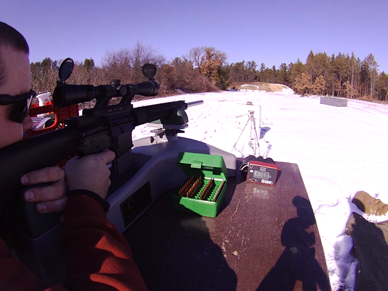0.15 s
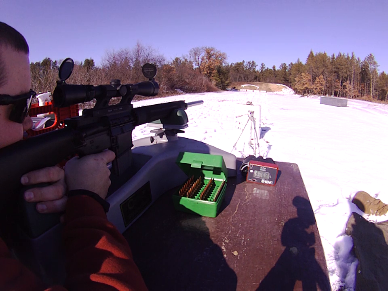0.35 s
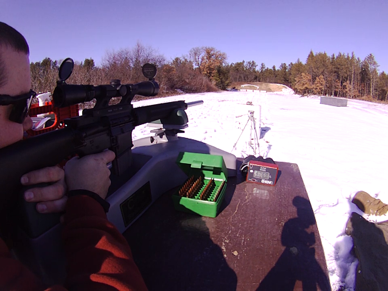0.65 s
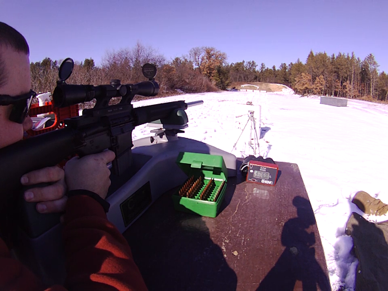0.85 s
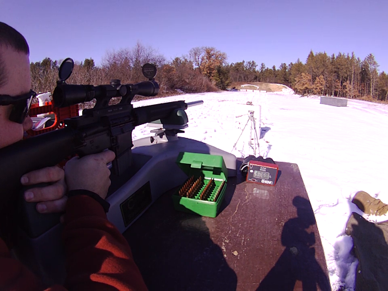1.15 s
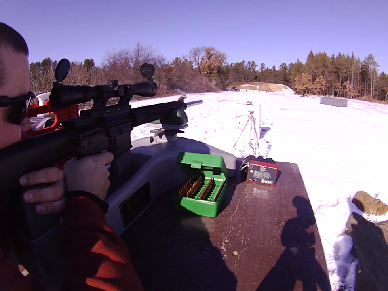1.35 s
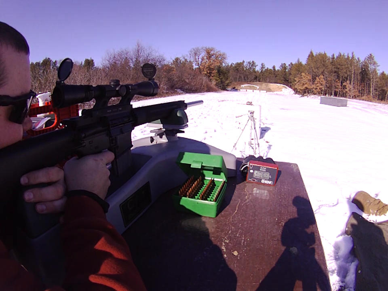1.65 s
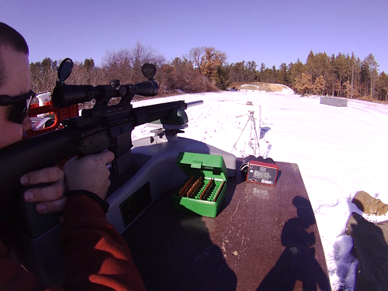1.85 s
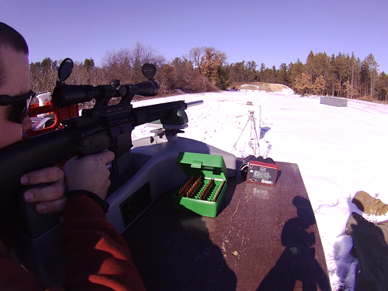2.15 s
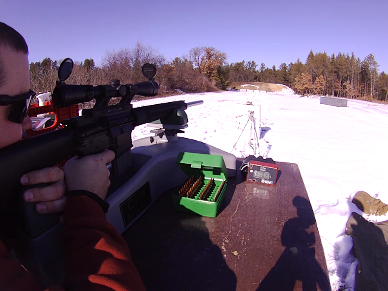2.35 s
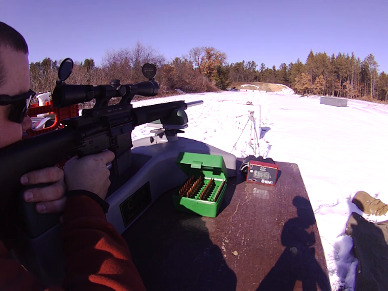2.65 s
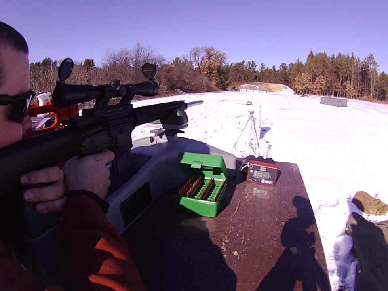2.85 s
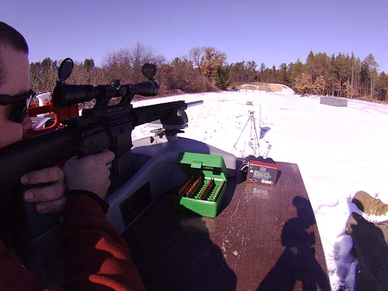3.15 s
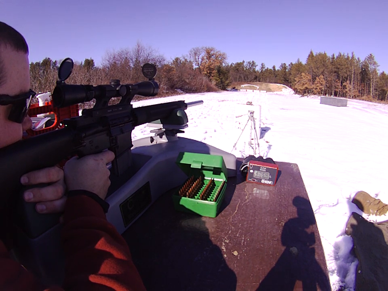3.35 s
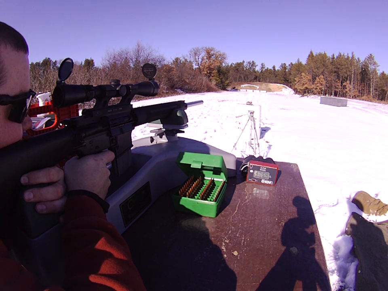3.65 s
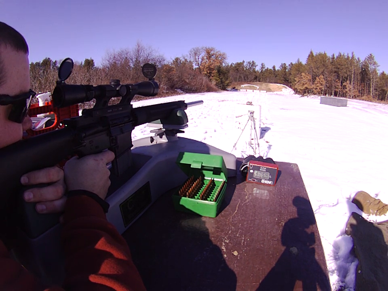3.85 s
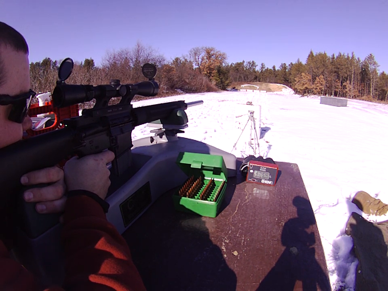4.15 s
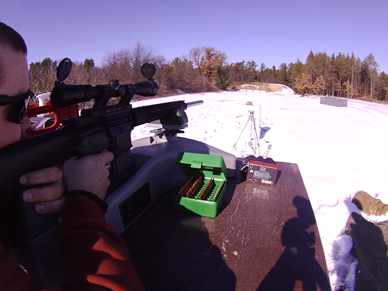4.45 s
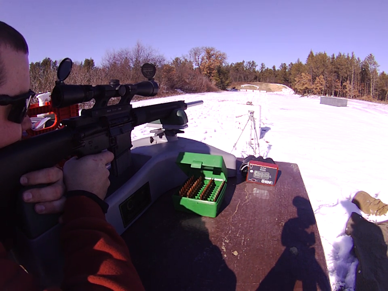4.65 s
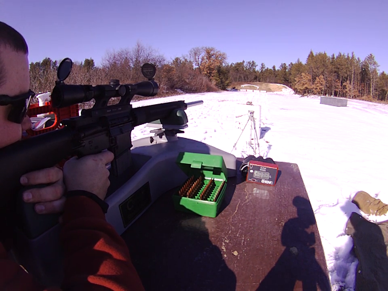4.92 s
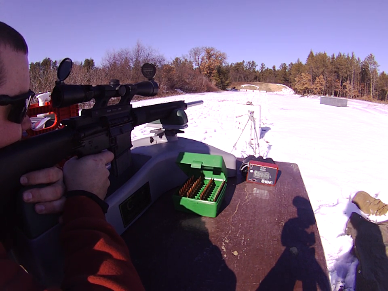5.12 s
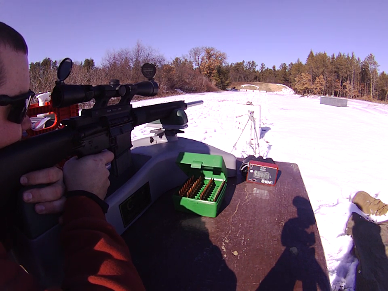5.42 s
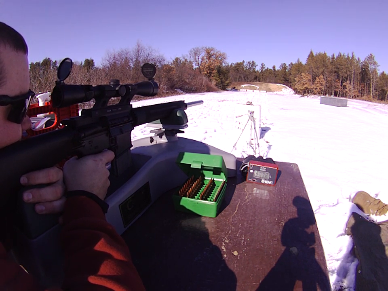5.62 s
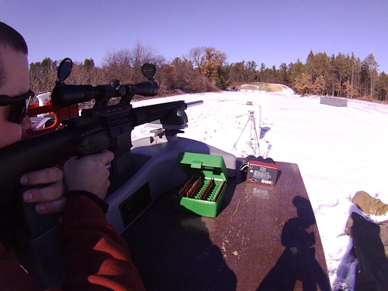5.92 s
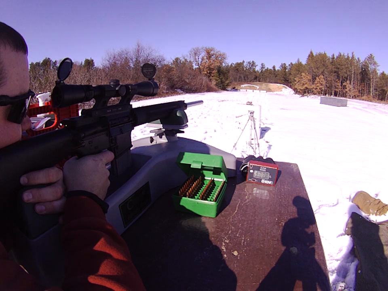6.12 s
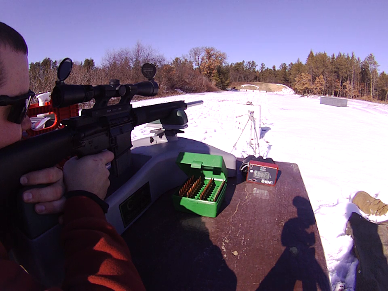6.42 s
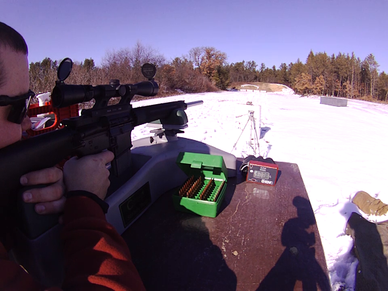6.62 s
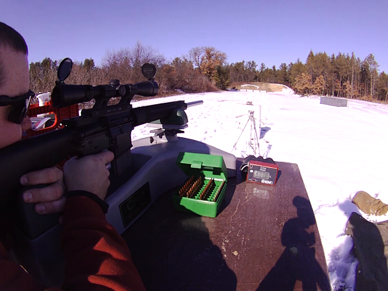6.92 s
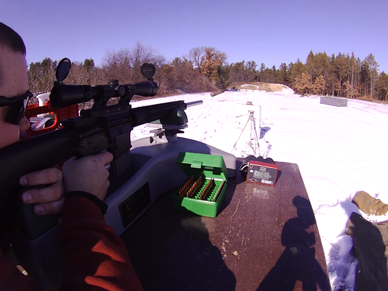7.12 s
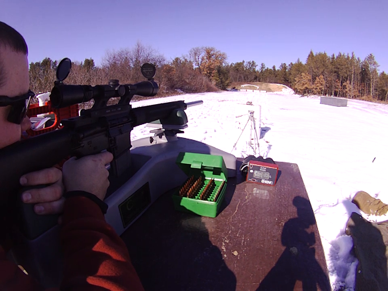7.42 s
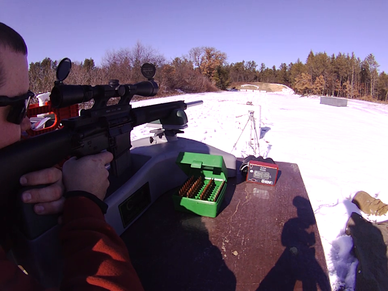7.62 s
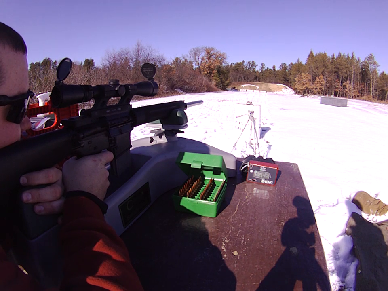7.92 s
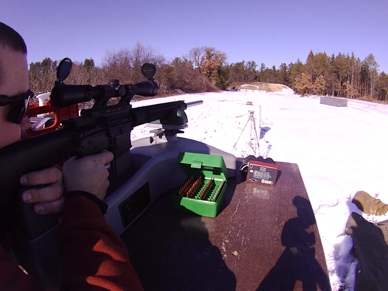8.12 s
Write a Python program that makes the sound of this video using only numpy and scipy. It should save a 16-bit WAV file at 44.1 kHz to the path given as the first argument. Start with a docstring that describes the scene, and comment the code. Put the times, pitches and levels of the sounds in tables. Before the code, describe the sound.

Wind thumps the microphone, then a rifle fires three sharp, echoing shots outdoors, each followed about a second later by a metallic click.

```python
"""Three rifle shots on a snowy range

A semi-automatic rifle fires from a bench, close enough to overload the microphone. The action cycles
with each shot, the tree line answers and the woods roar on for seconds; the trigger resets with a dry
click, a spent case pings. Wind buffets the microphone. The bed of breeze, woods and hiss sinks
after each shot, stays low a moment and swells back."""
import sys
import numpy as np
from scipy import signal
from scipy.fft import rfft, irfft, next_fast_len
from scipy.io import wavfile
from scipy.ndimage import map_coordinates

SR = 44100
rng = np.random.default_rng(int(sys.argv[2]) if len(sys.argv) > 2 else 0)


def int16_out(signal):
    """Quantize to a 16-bit WAV file."""
    q = np.round(np.clip(np.atleast_2d(signal).T, -1, 1) * 32767)
    wavfile.write(sys.argv[1], SR, q.astype(np.int16))


N = 364707
TIME = np.arange(N) / SR

# strong buffets on the microphone: (centre [s], length [s], thump [dB], upper edge [dB])
WIND_BUFFETS = [(.004, .025, -21.5, -29.5), (.151, .053, -26.5, -29), (0.244, .036, -24.5, -34.5),
                (.339, .055, -28.5, -45), (0.423, .028, -25.5, -44.5), (0.596, .034, -40, -56),
                (0.674, .06, -29.5, -53), (.808, .024, -26.5, -43.5), (0.921, .07, -37.5, -52.5),
                (1.121, .085, -24, -46.5), (1.273, .03, -25, -39.5), (1.329, .086, -27, -40.5),
                (3.816, .015, -43.5, -67.5), (3.926, 0.046, -32, -60), (7.961, .033, -49.5, -76),
                (8.145, .04, -38.5, -48), (8.238, 0.087, -36.5, -45)]
# strength of the breeze: (time [s], rumble [dB])
WIND_STRENGTH = [(.2, -31.5), (.52, -43.5), (.85, -44.5), (1.3, -43.5), (1.75, -51.5), (2.1, -41),
                 (2.4, -38.5), (2.9, -49), (3.35, -58.5), (3.92, -47), (4.3, -56), (5.3, -55),
                 (5.75, -48.5), (6.1, -59), (6.8, -56.5), (7.75, -55), (8.25, -38)]
# dips of the bed, deepest at the shots: (time [s], depth [dB], wait before swelling [s], swell [s])
BED_DIPS = [(-.3, 8, 0.45, 0.7), (1.1, 2, .25, 0.19), (1.364, 27.5, 0.44, 1.007), (4.335, 30, 1.1, 1.25),
            (6.1, 11, 0.48, 0.34), (6.75, 3.5, .33, .2), (7.112, 27, 0.68, .9)]
# rifle shots: (time [s], blast [dB], scatter [dB], echo [dB])
RIFLE_SHOTS = [(1.364, -0.5, 2, 2), (4.3353, -1.5, -3.5, -1.5), (7.112, 0.15, 0.5, 2.5)]
# moving parts of the action: (delay after the shot [s], level [dB], t60 [s], pitch [ratio])
ACTION_HITS = [(-.005, -19.5, .012, .76), (0.0205, -30.5, .02, 1.1), (0.0453, -32.5, .015, 1.25),
               (0.058, -44.5, 0.034, .6), (.0605, -25, 0.018, 1)]
# resonances of the action's steel: (frequency [Hz], width [Hz], level [dB])
STEEL_MODES = [(820, 460, -8), (1550, 500, -9), (2880, 200, -10), (3550, 260, -9), (4370, 340, -2.5),
               (5280, 170, 3), (6350, 360, -3), (8940, 1500, -14.5), (11700, 810, -20.5), (14900, 660, -21)]
# pressure fronts, direct and reflected: (delay [s], push [dB], crackle [dB], crackle length [s])
BLAST_FRONTS = [(.0004, -15, -3, 0.0019), (.0033, -5.5, -4.5, 0.0021), (.0053, -4.5, -7, .002),
                (.0094, -5.5, -24, 0.0054)]
# answers of the berm and the trees: (delay [s], rise [s], body [dB], treble [dB])
ECHO_RETURNS = [(.08, 0.054, -67, -63.5), (.165, 0.0023, -48, -71), (0.246, 0.005, -49.5, -80),
                (.255, 0.054, -81, -66), (.355, 0.025, -57, -79), (0.425, .005, -57, -90),
                (.4, 0.11, -71, -81)]
# trigger resets and small ticks of the rifle: (time [s], level [dB], t60 [s])
RIFLE_CLICKS = [(1.4842, -42.5, 0.016), (2.013, -61.5, .012), (2.3199, -12.5, 0.016), (4.881, -64, 0.009),
                (5.6368, -30.5, 0.022), (5.816, -63.5, 0.014), (7.5169, -58, .012), (7.657, -65, 0.012),
                (8.0254, -23, 0.018), (8.2, -61, 0.013)]
# spent cases landing: (time [s], level [dB])
CASE_LANDINGS = [(5.678, -71), (7.762, -67)]

# ringing bodies: (frequency [Hz], level [dB], t60 [s])
BOOM_MODES = [(215, -3.5, .032), (315, -4.5, .032), (660, -12.5, .038), (910, -25, .035), (1060, -26, .035),
              (1600, -25, .022)]  # bench and rifle body
STOCK_MODES = [(116, -10, 0.4), (226.5, -3.5, 0.24), (337, 6.5, 0.061), (554, 3.5, 0.036), (786, 5, 0.054)]
BRASS_MODES = [(10820, -10, 0.24), (14670, 3, .1)]

# noise colours: (frequency [Hz], level [dB])
THUMP_EQ = [(25, -14), (70, -11), (130, -6), (205, 2), (290, -3.5), (400, -11), (550, -26), (1200, -53),
            (3000, -78)]
BUFFET_EDGE_EQ = [(150, -18.5), (330, 1), (500, 3), (680, -6), (900, -16), (1400, -27), (2200, -50.5),
                  (4000, -68)]
RUMBLE_EQ = [(20, 1), (50, 0), (130, 1), (250, -6.5), (500, -18.5), (1500, -50.5)]
ROAR_BODY_EQ = [(100, -25), (250, -6), (450, 2.5), (600, 1.5), (900, -7), (1500, -20), (3000, -40)]
ROAR_EDGE_EQ = [(350, -18), (700, 0.5), (1050, 2.5), (1300, -6), (1700, -7.5), (2300, -16), (4000, -24),
                (8000, -49)]
HISS_EQ = [(300, 1), (1500, 4), (3000, 2), (6000, -1.5), (10000, -3.5), (15000, -7)]
CRACKLE_EQ = [(200, -9.5), (1000, 2), (2500, -3.5), (4000, -1.5), (5300, 1), (8000, -4.5), (11000, -10),
              (15000, -12)]
SCATTER_EQ = [(30, -40.5), (70, -17), (130, -6), (200, -1.5), (340, 3), (520, -5.5), (670, -4),
              (850, -10.5), (1150, -12.5), (1900, -23), (3000, -26.5), (5500, -27), (9000, -31.5),
              (15000, -44)]
ECHO_BODY_EQ = [(60, -21), (200, -9), (400, 4.5), (1000, -2), (1500, -10), (1900, -12), (3200, -38),
                (8000, -50)]
ECHO_TREBLE_EQ = [(1000, -1), (2500, 5), (3900, 6.5), (4700, 4), (5600, 4), (7500, -10), (14000, -46)]


def amp(db):
    """Decibels to gain."""
    return 10 ** (np.asarray(db) / 20)


def unit(x):
    """Scale to rms 1."""
    return x / np.sqrt(np.mean(x ** 2) + 1e-20)


def filtered(x, response):
    """Shape x with a frequency response."""
    size = next_fast_len(len(x) + 8192)
    return irfft(rfft(x, size) * response(np.fft.rfftfreq(size, 1 / SR)), size)[:len(x)]


def low_cut(x, hz):
    """Roll off the bass at 12 dB an octave."""
    return signal.sosfilt(signal.butter(2, hz, "highpass", fs=SR, output="sos"), x)


def noise(eq, size=N):
    """Noise of rms 1, coloured by an EQ curve."""
    points_hz, db = np.transpose(eq)
    white = rng.standard_normal(size)
    return unit(filtered(white, lambda hz: amp(np.interp(np.log(hz + 1), np.log(points_hz), db))))


def wobble(rate):
    """A smooth random curve, rate knots a second."""
    return map_coordinates(rng.standard_normal(int(N * rate / SR) + 4), [TIME * rate])


def since(start):
    """Seconds since start, zero before it."""
    return np.maximum(TIME - start, 0)


def fade(t, t60):
    """Exponential decay by 60 dB in t60."""
    return np.exp(-np.log(1000) * t / t60)


def ring(modes, t):
    """Damped sines of a struck body."""
    return sum(amp(db) * fade(t, t60) * np.sin(2 * np.pi * hz * t) for hz, db, t60 in modes)


def add(track, start, sound):
    """Mix a sound into the track at start seconds."""
    part = track[round(start * SR):][:len(sound)]
    part += sound[:len(part)]


def buffets(steepness=3.1):
    """Eddies thump the microphone port; some have a brighter edge."""
    thump, edge = np.zeros(N), np.zeros(N)
    for centre, length, thump_db, edge_db in WIND_BUFFETS:
        eddy = np.exp(-np.abs(2 * (TIME - centre) / length) ** steepness)
        thump += amp(thump_db) * eddy
        edge += amp(edge_db) * eddy
    return thump * noise(THUMP_EQ) + edge * noise(BUFFET_EDGE_EQ)


def breeze(gust_db=2.5, eddy_db=-8, eddy_growth=2.0, strong_db=-38, lumpy_db=5):
    """Wind rumbles on the microphone; the harder it blows, the more small eddies flutter on top."""
    strength_db = np.interp(TIME, *np.transpose(WIND_STRENGTH))
    rumble = amp(strength_db + gust_db * wobble(13)) * noise(RUMBLE_EQ)
    flutter_db = strong_db + eddy_db + eddy_growth * (strength_db - strong_db)
    eddies = amp(flutter_db + lumpy_db * wobble(30)) * noise(THUMP_EQ)
    return rumble + eddies


def woods(rush_db=-58, roar_db=-39, hold_s=0.86, fall_db_per_s=12, edge_db=3.5, dulling_db_per_s=7):
    """The trees rush steadily; each shot roars on among them, holds, and dulls as it dies away."""
    body_power, edge_power = np.full(N, amp(rush_db) ** 2), np.zeros(N)
    for start, _, _, echo_db in RIFLE_SHOTS:
        power = (TIME > start) * amp(roar_db + echo_db - fall_db_per_s * since(start + hold_s)) ** 2
        brightness = amp(edge_db - dulling_db_per_s * since(start)) ** 2
        body_power += power / (1 + brightness)
        edge_power += power * brightness / (1 + brightness)
    roar = np.sqrt(body_power) * noise(ROAR_BODY_EQ) + np.sqrt(edge_power) * noise(ROAR_EDGE_EQ)
    return roar * amp(0.5 * wobble(25))  # slight flutter


def dips(sink_s=0.09):
    """The bed dips: it sinks, stays low and swells back evenly in dB."""
    db = np.zeros(N)
    for start, depth_db, wait, swell in BED_DIPS:
        lowered = np.minimum(since(start) / sink_s, 1 - since(start + wait) / swell)
        db = np.minimum(db, -depth_db * np.clip(lowered, 0, 1))
    return amp(db)


def bed(hiss_db=-59.5, floor_db=-91):
    """Breeze, woods and hiss dip together over a faint steady floor."""
    ambience = breeze() + woods() + amp(hiss_db) * noise(HISS_EQ)
    return dips() * ambience + amp(floor_db) * noise(HISS_EQ)


def steel_click(db, t60, pitch=1, tail_db=-30, tail_t60=0.07, low_cut_hz=500):
    """Steel meets steel: a brief rattle through the resonances of the action."""
    def response(hz):
        f = hz / pitch
        steel = sum((-1) ** k * amp(mode_db) * 1j * f * width / (centre ** 2 - f ** 2 + 1j * f * width)
                    for k, (centre, width, mode_db) in enumerate(STEEL_MODES))
        return steel * hz ** 2 / (hz ** 2 + low_cut_hz ** 2)  # small parts give no bass

    t = TIME[:SR // 4]
    rattle = unit(filtered(rng.standard_normal(len(t)), response))
    return amp(db) * rattle * (fade(t, t60) + amp(tail_db) * fade(t, tail_t60))


def blast(push_s=0.00037, onset_s=0.000071):
    """Each front throws the overloaded diaphragm the other way, with crackle and a boom of the bench."""
    t, out = TIME[:SR // 4], np.zeros(SR // 4)
    pulse = (1 - t / push_s) * np.exp(-t / push_s) * (1 - np.exp(-t / onset_s))
    push = pulse + ring(BOOM_MODES, t)
    for k, (delay, push_db, crackle_db, length) in enumerate(BLAST_FRONTS):
        crackle = noise(CRACKLE_EQ, size=len(t)) * np.exp(-(t / length) ** 4)
        add(out, delay, amp(crackle_db) * crackle + (-1) ** k * amp(push_db) * push)
    return low_cut(out, hz=150)  # the deep bass is trimmed, leaving a tight, hard crack


def roll(db=-44, fall_db_per_s=71.5):
    """A short low rumble rolls over the field behind each shot."""
    envelope = sum((TIME > start) * amp(db + blast_db - fall_db_per_s * since(start))
                   for start, blast_db, _, _ in RIFLE_SHOTS)
    return envelope * noise(RUMBLE_EQ)


def scatter(db=-8.5, delay_s=0.011, rise_s=0.00044, spread_s=0.027, falloff=2.844):
    """Ground and benches throw the blast back, weaker the farther the front has spread."""
    age = np.maximum(TIME[:SR] - delay_s, 0)
    envelope = (1 - np.exp(-age / rise_s)) / (1 + age / spread_s) ** falloff
    return amp(db) * envelope * noise(SCATTER_EQ, size=SR)


def echoes(patchy_db=1.5):
    """The berm returns short slaps, the trees a broad rustling swell that comes back in clumps."""
    t, out = TIME[:SR], np.zeros(SR)
    for delay, rise, body_db, treble_db in ECHO_RETURNS:
        swell = t / rise * np.exp(1 - t / rise)
        body = amp(body_db) * noise(ECHO_BODY_EQ, size=SR)
        treble = amp(treble_db) * noise(ECHO_TREBLE_EQ, size=SR)
        add(out, delay, swell * (body + treble))
    return out * amp(patchy_db * wobble(69.7)[:SR])


def shots():
    """Hammer, blast, bolt back and bolt home, with the range answering each shot."""
    out = np.zeros(N)
    for start, blast_db, scatter_db, echo_db in RIFLE_SHOTS:
        add(out, start, amp(blast_db) * blast())
        add(out, start, amp(scatter_db) * scatter() + amp(echo_db) * echoes())
        for delay, db, t60, pitch in ACTION_HITS:
            add(out, start + delay, steel_click(db, t60, pitch))
    return out


def trigger_clicks(knock_db=-22, knock_rise_s=0.011):
    """The trigger resets and the rifle ticks: dry steel with a knock of the stock underneath."""
    t, out = TIME[:SR // 2], np.zeros(N)
    knock = ring(STOCK_MODES, t) * (1 - np.exp(-t / knock_rise_s))
    for start, db, t60 in RIFLE_CLICKS:
        add(out, start, steel_click(db, t60))
        add(out, start, amp(db + knock_db) * knock)
    return out


def case_pings():
    """Spent brass lands with a thin, high ring."""
    out = np.zeros(N)
    for start, db in CASE_LANDINGS:
        add(out, start, amp(db) * ring(BRASS_MODES, TIME[:SR // 2]))
    return out


def scene():
    """The mono mix, at one microphone beside the shooter."""
    return (shots() + trigger_clicks() + case_pings() + roll() + buffets() + bed())[None]


def record(dry, top_hz=15750, taper_hz=600):
    """The blasts clip at full scale; the deepest bass and the highest treble are trimmed off."""
    clipped = np.clip(dry[0], -1, 1)
    tightened = low_cut(clipped, hz=32)
    return filtered(tightened, lambda hz: np.clip((top_hz - hz) / taper_hz, 0, 1))[None]


dry = scene()
out = record(dry)
int16_out(out)
```